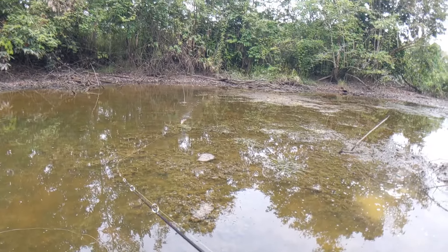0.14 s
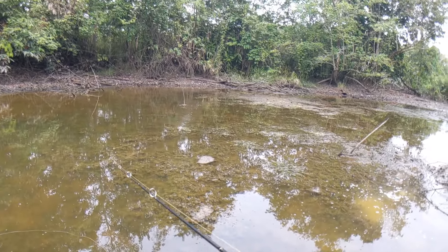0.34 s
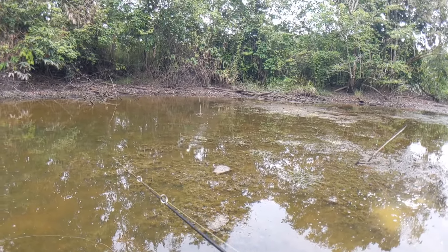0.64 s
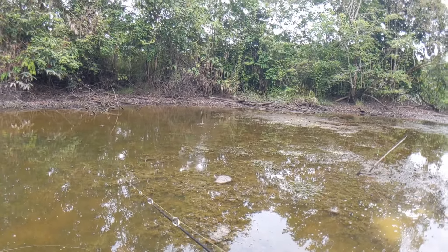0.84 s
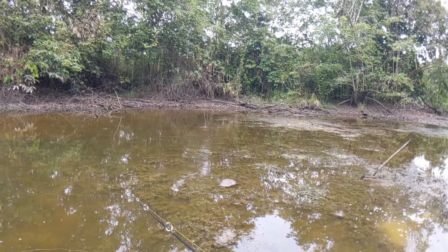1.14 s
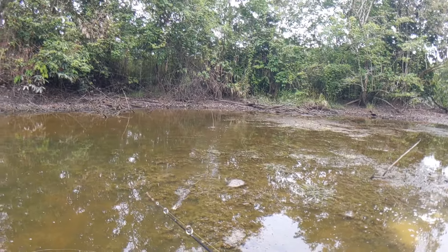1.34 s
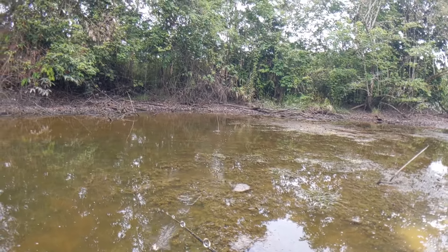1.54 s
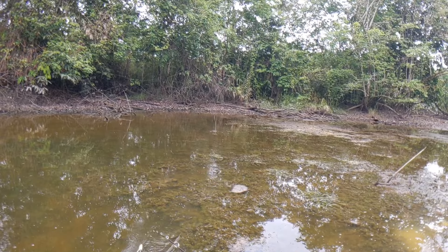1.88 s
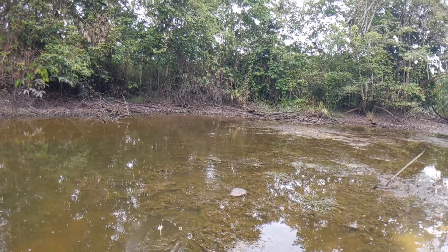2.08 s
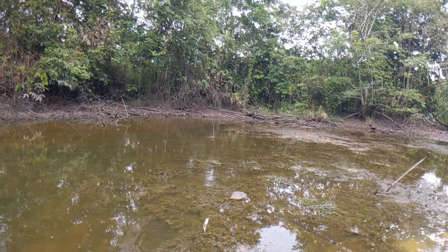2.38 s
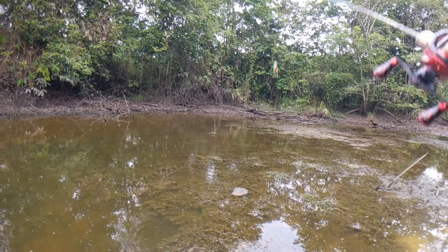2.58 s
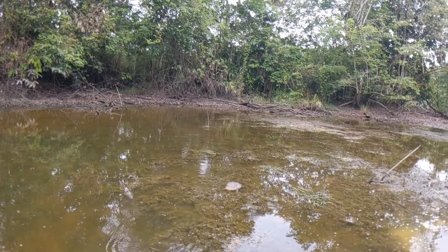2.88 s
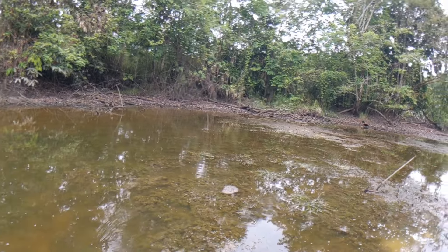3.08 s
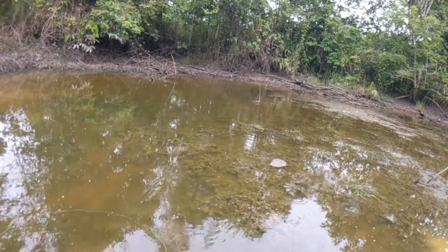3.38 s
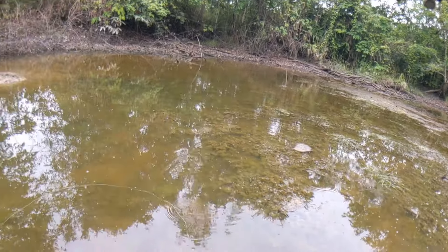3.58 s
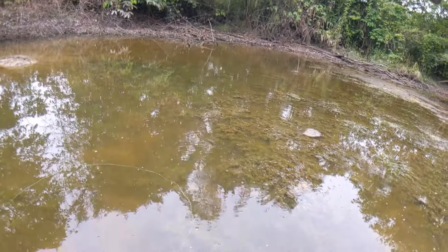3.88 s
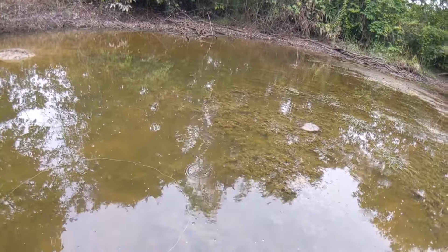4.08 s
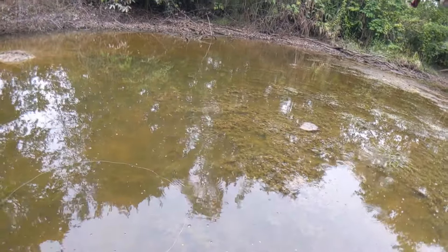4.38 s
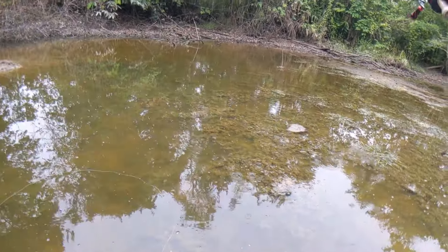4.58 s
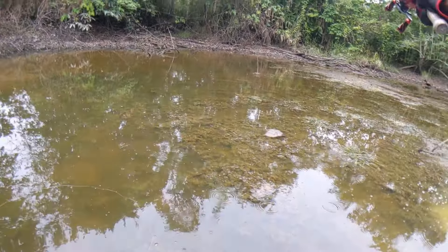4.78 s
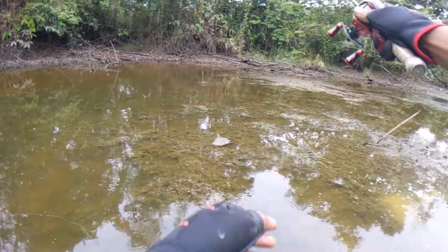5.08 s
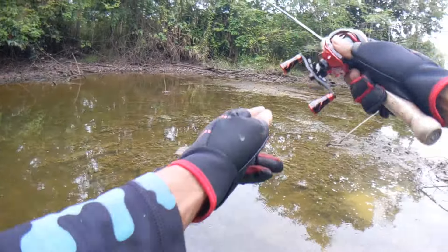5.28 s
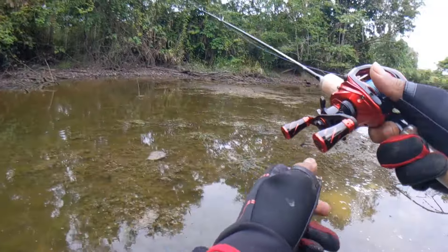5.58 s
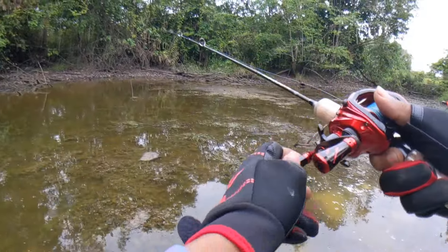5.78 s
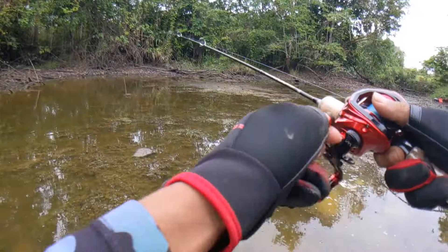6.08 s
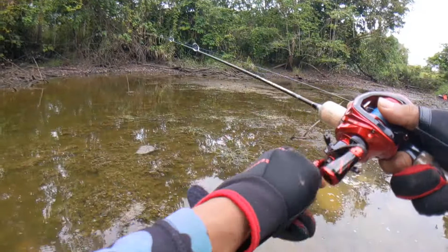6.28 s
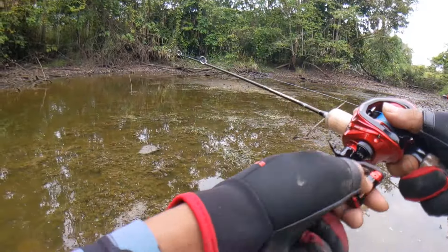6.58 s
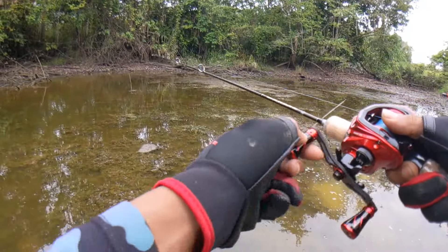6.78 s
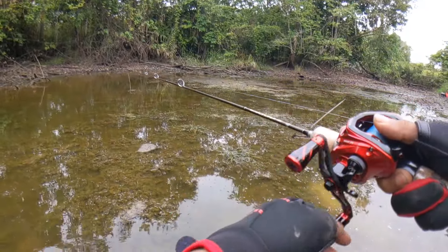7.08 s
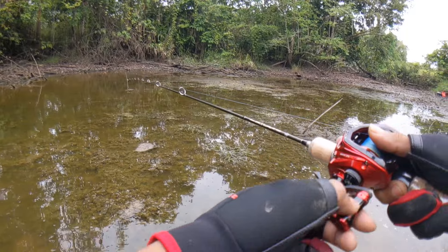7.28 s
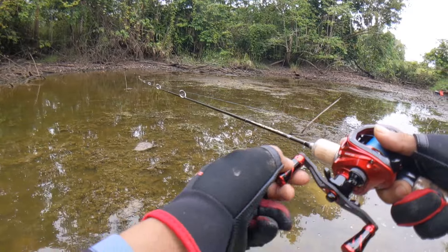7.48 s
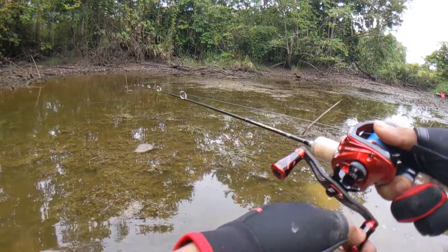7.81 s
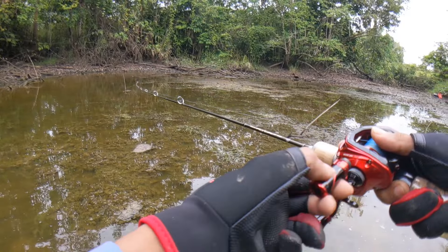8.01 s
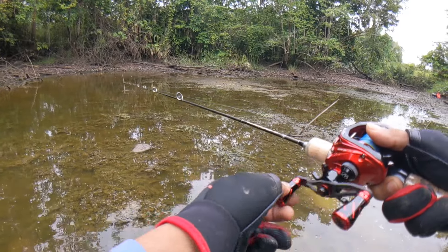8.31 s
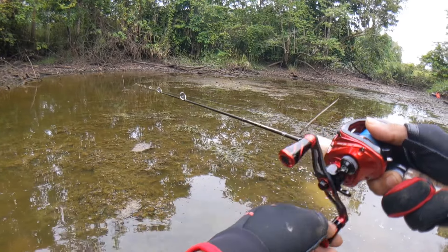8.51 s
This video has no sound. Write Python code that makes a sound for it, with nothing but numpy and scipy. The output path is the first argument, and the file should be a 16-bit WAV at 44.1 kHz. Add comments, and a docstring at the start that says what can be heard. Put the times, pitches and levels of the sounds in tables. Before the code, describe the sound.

Two sharp reel clicks stand out above stirred pond water, fine line ticks, echoing birds with falling calls, and droning insects.

```python
"""Lure fishing at a forest pond: small birds call from trees that scatter every note, as noise bands of insects
drone over a far low hum. From the start a lure stirs the weed close by, in fizz, droplets and rising bubbles,
while line and rod tick; one bird warbles, another whistles, and a third soon repeats a falling call. The reel
snaps free at 2.4 s and the lure splashes down about a second later; a high bird dips its note at 4 and 7 s.
The reel snaps shut at 5.6 s; sparse crank ticks, bursts of filtered noise, run from 4.9 s to the end."""
import sys
import numpy as np
from scipy import signal
from scipy.fft import rfft, irfft, next_fast_len
from scipy.io import wavfile
from scipy.ndimage import uniform_filter1d

SR = 44100
rng = np.random.default_rng(int(sys.argv[2]) if len(sys.argv) > 2 else 0)


def store_wav(level_fs):
    """Save 16-bit WAV to argv[1]."""
    pcm = np.round(np.clip(np.atleast_2d(level_fs), -1, 1) * 32767)
    wavfile.write(sys.argv[1], SR, pcm.T.astype(np.int16))


N = 381465
TIME, FREQ = np.arange(N) / SR, np.fft.rfftfreq(N, 1 / SR)  # s, Hz

# How the outdoor air, insects included, rises and falls: (time [s], level [dB])
AIR_LEVEL = [(0, -51), (5.3, -51.5), (5.7, -54), (8.6, -53)]


def amp(db):
    """Decibels to gain."""
    return 10 ** (np.asarray(db) / 20)


def unit(x):
    """Scales to rms 1."""
    return x / np.sqrt(np.mean(x ** 2) + 1e-20)


def read(points, hz):
    """Reads a spectrum on a log-frequency axis."""
    f, value = np.transpose(points)
    return np.interp(np.log(hz + 1), np.log(f + 1), value)


def level(rows, column=1):
    """Gain over time from one dB column of a curve."""
    rows = np.asarray(rows)
    return amp(np.interp(TIME, rows[:, 0], rows[:, column]))


def sides(balance_db):
    """Left and right gains for a level difference; positive leans left."""
    return amp(np.array([[.5], [-.5]]) * balance_db)


def add(mix, s, sound):
    """Mixes a sound in at time s."""
    part = mix[..., max(round(s * SR), 0):][..., :sound.shape[-1]]
    part += sound[..., :part.shape[-1]]


def colour(x, gain):
    """Filters a full-length sound by a gain for each frequency."""
    size = next_fast_len(N)
    hz = np.fft.rfftfreq(size, 1 / SR)
    fitted = np.apply_along_axis(lambda g: np.interp(hz, FREQ, g), -1, gain)
    return irfft(rfft(x, size) * fitted, size)[..., :N]


def drift(rate):
    """Random wander of rms 1 along straight lines between knots, rate knots a second."""
    knots = rng.standard_normal(8192)
    return unit(np.interp(TIME * rate, np.arange(len(knots)), knots))


def band(hz, width_hz):
    """Gain of a bell-shaped resonance, width_hz wide at half power."""
    return 1 / (1 + ((FREQ - hz) / (.78 * width_hz)) ** 2)


def pair(gain):
    """Coloured noise at two microphones, most alike in the bass, where waves are long."""
    # (frequency [Hz], likeness of the two sides [0-1])
    likeness = [(30, 0.78), (150, 0.72), (500, 0.35), (1200, 0.25), (4000, 0.11)]
    a, b = rng.standard_normal((2, N))
    same = np.clip(read(likeness, FREQ), -1, 1)
    left = colour(a, gain)
    right = colour(a, gain * same) + colour(b, gain * np.sqrt(1 - same ** 2))
    return unit(np.array([left, right]))


def voice(notes, waver):
    """Near-sine notes, each along rows of (s, Hz, dB), with a slight quaver of pitch."""
    out = np.zeros(N)
    for rows in notes:
        s, hz, db = np.transpose(rows)
        t = np.arange(s[0], s[-1], 1 / SR)
        quaver = unit(uniform_filter1d(rng.standard_normal(SR), size=90))[:len(t)]
        turns = np.cumsum(np.interp(t, s, hz) * (1 + waver * quaver)) / SR
        loudness = np.sqrt(2) * amp(np.interp(t, s, db))
        soft_ends = signal.windows.tukey(len(t), .08)
        add(out, s[0], loudness * np.sin(2 * np.pi * turns) * soft_ends)
    return out


def forest(x, direct_db, direct_pan_db, near_db, far_db, far_pan_db, build_s):
    """Direct sound, quick scatter from nearby leaves, and a tail that builds up from the trees across the pond."""
    # How long the trees ring: (frequency [Hz], t60 [s])
    tree_t60 = [(1500, 1), (3000, 0.49), (5000, 0.8), (8000, 0.51)]
    # sparse random reflections, on average 2500 a second
    taps = rng.standard_normal((2, 2, SR)) * (rng.random((2, 2, SR)) < 2500 / SR)
    age = np.arange(SR) / SR
    near = taps[0] * amp(-60 * age / 0.22) * (1 - np.exp(-age / 0.0013))
    # the far tail dies at its own pace in each frequency
    hz, t, z = signal.stft(taps[1], SR, nperseg=256)
    decay = amp(-60 * t / read(tree_t60, hz)[:, None])
    far = signal.istft(z * decay, SR, nperseg=256)[1][:, :SR]
    far = far * (1 - np.exp(-(age / build_s) ** 2))
    echo = (amp(near_db) * unit(near) + amp(far_db) * sides(far_pan_db) * unit(far)) / np.sqrt(SR)
    direct = np.array([x, np.roll(x, shift=1)])
    scattered = signal.oaconvolve(x[None], echo, axes=1)[:, :N]
    return amp(direct_db) * sides(direct_pan_db) * direct + scattered


def crack(spectrum, t60):
    """A dense rattle of small parts with a spectrum of (Hz, dB), dying within milliseconds."""
    t = np.arange(4096) / SR
    burst = rng.standard_normal((2, len(t))) * amp(-60 * t / t60) * (1 - np.exp(-t / 0.00016))
    gain = amp(read(spectrum, np.fft.rfftfreq(len(t), 1 / SR)))
    # shifted while filtered, so that the filter's pre-ringing can be cut off
    shaped = irfft(rfft(np.roll(burst, shift=256, axis=1)) * gain)
    return shaped[:, 256:]


def reel():
    """The clutch snaps as noise bursts and rings the housing's damped sines; gears, line and rod tick."""
    # Snaps of the clutch: (time [s], level [dB], t60 [s], housing ring re snap [dB], left-right [dB])
    snaps = [(2.3697, -14.5, 0.023, -8, -5), (2.3712, -9, 0.01, 3, 0.5), (5.558, -24, 0.02, -10, 2),
             (5.564, -37, 0.034, 3.5, 29), (5.575, -31, 0.12, -20, 2), (5.5833, -24.5, 0.046, -12, 7),
             (5.5874, -12.5, 0.011, -15, -1), (5.591, -9, 0.0074, -24, 6), (5.5939, -24, 0.02, -25, 15)]
    # Spectrum of a snap: (frequency [Hz], level [dB])
    snap_colour = [(100, -55), (400, -7), (900, 2.5), (1600, 0.5), (2600, 5.5), (4400, 7.5), (5800, 1.5),
                   (8000, 5), (10500, -1.5), (14500, -1)]
    # Modes of the reel's housing: (frequency [Hz], level [dB], t60 [s])
    housing = [(1100, -4, 0.016), (2980, -28, 0.033), (5420, -12, 0.014)]
    # Ticks of line and rod: (time [s], knock level [dB], click level [dB], left-right [dB])
    ticks = [(0.1894, -42, -18, 6), (.2395, -24, -19.5, -1), (.277, -29, -17.5, -1),
             (0.5642, -29, -16.5, -3), (0.598, -30, -21, 2), (0.675, -31, -22, 0), (0.884, -32, -24, -5),
             (1.5484, -24.5, -23.5, -1), (1.5742, -29, -23.5, 4), (1.6292, -25, -25, 5),
             (1.666, -23.5, -29, 11), (3.0006, -35, -28.5, -4), (3.242, -31, -20, -1),
             (5.3037, -22.5, -28, 5), (5.5242, -25.5, -14, 0.5), (5.8697, -32, -22, 2),
             (5.874, -20, -17.5, 2), (6.041, -33.5, -23, -6), (6.2101, -37, -27, -7),
             (6.9403, -41, -26, -11), (7.647, -35, -23, -9)]
    # Where knock, click and fizz lie: (frequency [Hz])
    tick_hz = [1100, 3980, 11900]
    # Thin high ticks of the turning crank: (time [s], level [dB])
    crank = [(4.9267, -29), (6.5965, -25), (6.827, -26.5), (6.925, -29.5), (7.808, -29), (8.2988, -29),
             (8.331, -28), (8.5083, -30)]
    # Spectrum of a crank tick: (frequency [Hz], level [dB])
    crank_colour = [(1100, -28), (4030, -25), (11700, 1)]
    tick_t60_s, fizz_db, crank_pan_db = .015, -5, 6  # the fizz level is relative to the knock

    out, t = np.zeros((2, N)), np.arange(4096) / SR
    late = np.maximum(t - np.array([[.00025], [0]]), 0)  # the reel is nearer the right side
    ring = sum(amp(db - 60 * late / t60) * np.sin(2 * np.pi * hz * late) for hz, db, t60 in housing)
    for s, db, t60, ring_db, pan_db in snaps:
        add(out, s, amp(db) * sides(pan_db) * crack(snap_colour, t60))
        add(out, s, amp(db + ring_db) * sides(pan_db) * ring)
    for s, knock_db, click_db, pan_db in ticks:
        spectrum = list(zip(tick_hz, [knock_db, click_db, knock_db + fizz_db]))
        add(out, s, sides(pan_db) * crack(spectrum, tick_t60_s))
    for s, db in crank:
        add(out, s, amp(db) * sides(crank_pan_db) * crack(crank_colour, tick_t60_s))
    # small parts radiate little bass
    return signal.sosfilt(signal.butter(2, 300, "high", fs=SR, output="sos"), out)


def churn(s, rise_s, hold_s):
    """Gain over time of disturbed water: it swells, holds, settles quickly and sloshes on."""
    settle_t60_s, slosh_db, slosh_t60_s = 0.56, -8.5, 1.36
    after = np.maximum(TIME - s - rise_s - hold_s, 0)
    release = np.maximum(amp(-60 * after / settle_t60_s), amp(slosh_db - 60 * after / slosh_t60_s))
    return np.clip((TIME - s) / rise_s, 0, 1) * release


def water():
    """A fizz of spray and separate ringing droplets where the lure moves, and single bubbles of rising pitch."""
    # The lure stirs the water: (time [s], rise [s], hold [s], level [dB])
    stirs = [(-.25, 0.46, 1.25, -45.5), (1.53, 0.05, 0.064, -45), (1.75, 0.067, 0.15, -54),
             (3.152, 0.033, .01, -47.5), (3.329, 0.047, 0.02, -39.5), (6.74, .12, .01, -53),
             (7.844, 0.065, 0.065, -61)]
    # Spectrum of the stirred water: (frequency [Hz], level [dB])
    stir_colour = [(100, -13), (250, -3.5), (450, 1), (1000, 3), (1500, -1), (2500, 1.5), (4300, -2.5),
                   (6500, -6), (10000, -13), (12500, -9), (15000, -18)]
    # Plips, each a bubble whose pitch rises: (time [s], middle pitch [Hz], level [dB])
    plips = [(2.313, 1015, -51.5), (3.351, 1060, -45.5), (3.388, 4150, -37), (3.396, 4350, -36),
             (3.408, 1710, -43.5), (4.216, 1020, -53.5), (4.724, 1620, -47), (4.735, 2230, -48.5),
             (4.986, 1900, -53), (5.254, 786, -52), (6.041, 2350, -44), (6.645, 1050, -60),
             (6.848, 740, -53.5), (7.374, 2290, -51), (7.868, 450, -59.5), (7.872, 724, -55.5),
             (7.92, 970, -57), (7.945, 1074, -56), (8.023, 1080, -59), (8.084, 2360, -46.5),
             (8.226, 2300, -44.5), (8.493, 1050, -55.5)]
    lapping_db = -59.5  # the pond's own faint stir
    bubble_cycles = 15.7  # small bubbles die sooner

    drops = (rng.random(N) < 420 / SR) * amp(3.1 * np.minimum(rng.exponential(1, N), 3))
    kind, t, patter = rng.integers(0, 20, N), np.arange(400) / SR, np.zeros(N)
    for k, hz in enumerate(np.geomspace(450, 13000, 20)):  # each droplet rings a few cycles
        droplet = np.sin(2 * np.pi * hz * t) * np.exp(-t * hz / 3.0) * hz
        patter += signal.oaconvolve(drops * (kind == k), droplet)[:N]
    droplets = unit(np.array([np.roll(patter, shift=11), patter]))  # the left side hears them later
    fizz = pair(np.ones(len(FREQ))) + amp(-2) * droplets

    power = sum((amp(db) * churn(s, rise_s, hold_s)) ** 2 for s, rise_s, hold_s, db in stirs)
    motion = np.sqrt(amp(lapping_db) ** 2 + power)
    stir = unit(colour(fizz, amp(read(stir_colour, FREQ)))) * motion * amp(2 * drift(rate=45))

    bubbles = []
    for s, hz, db in plips:
        length = bubble_cycles / hz
        bubbles.append([(s, hz / 1.14, db), (s + length / 2, hz, db), (s + length, hz * 1.09, db)])
    return stir + sides(3.8) * voice(bubbles, waver=0.077)


def spray():
    """Tiny drops patter back on the pond after the splash, as flickering high noise."""
    flicker = amp(-43.5 + 2.2 * drift(rate=56))
    return flicker * churn(3.36, rise_s=0.014, hold_s=.005) * pair(band(11000, 4500))


def gurgle(count=80):
    """Faint bubbles burst in the mud at random, each a short rising note."""
    when, size, loud = rng.random((count, 3)).T
    s, hz, db = when * TIME[-1], 340 * 4 ** size, -65 + 8 * loud
    bubbles = [[(at, f, d), (at + 20 / f, f * 1.2, d - 10)] for at, f, d in zip(s, hz, db)]
    return sides(3.8) * voice(bubbles, waver=0.024)


def falling_bird():
    """A short level lead-in near 6 kHz, a brief dip in loudness, then a fast slide down about an octave."""
    # Shape of one call: (time from its knee [s], pitch [Hz], level [dB]), before the factors of each call
    shape = [(-.042, 6050, -24), (-.02, 6103, -5), (-.007, 6300, -14.5), (.002, 6200, -8),
             (.014, 5600, -4.5), (.027, 4900, -3), (.04, 4250, -3.5), (.055, 3606, -10.5),
             (0.072, 2910, -25)]
    # The calls: (time of the knee [s], level [dB], pitch factor, length factor)
    falls = [(0.877, -37, 1, 1.14), (1.287, -38.5, 0.95, 1.43), (3.814, -38.5, 0.98, 1.15),
             (4.28, -36.5, .99, 1.27), (4.85, -36, 0.99, 1.14), (5.415, -34, 0.96, 1.03),
             (6, -39.5, 0.96, 0.99), (7.036, -35, 1.01, 0.99), (7.566, -34.5, 1.01, 0.91),
             (8.095, -33.5, 0.99, 0.98), (8.633, -31.5, 1.015, 1.03)]
    s, hz, db = np.transpose(shape)
    notes = [np.column_stack([at + s * length, hz * pitch, db + loud_db])
             for at, loud_db, pitch, length in falls]
    flutter = amp(1.6 * drift(rate=180))
    out = np.zeros((2, N))
    for k in range(3):  # three sets of reflections take turns, so the echo shifts from call to call
        call = voice(notes[k::3], waver=.005) * flutter
        out += forest(call, direct_db=-7.0, direct_pan_db=-8.5, near_db=-3.5,
                      far_db=-2.5, far_pan_db=7.5, build_s=0.052)
    return out


def high_bird():
    """A loud thin note on the left that dips and rises again; it fades toward a catch, then bursts out anew."""
    # The calls: (time [s], length [s], level [dB], swell start to end [dB], rise [s], catch [share of length])
    dips = [(4.017, .122, -24.5, 2, .02, 0.43), (7.13, .124, -31, -1.5, 0.0097, .53)]
    top_hz, depth_hz, skew = 8400, 1173, 0.77  # the pitch sinks and climbs back in one arch
    catch_s, catch_depth_db = 0.011, -13  # the voice fades just before its catch
    attack_power, release_s, edge_db = 7, .009, -15  # a quieter start, then the note opens at once

    u, notes = np.linspace(0, 1, 80), []
    hz = top_hz - depth_hz * np.sin(np.pi * u ** skew)
    for s, length, db, swell_db, rise_s, catch_at in dips:
        attack = (u * length / rise_s) ** attack_power
        release = (1 - u) * length / release_s
        opening = np.minimum(np.minimum(attack, release), 1)
        catch_db = catch_depth_db * np.exp(-abs(catch_at - u) * length / catch_s) * (u < catch_at)
        loud_db = db + swell_db * (u - .5) + catch_db + edge_db * (1 - opening)
        notes.append(np.column_stack([s + length * u, hz, loud_db]))
    return forest(voice(notes, waver=.007), direct_db=-12.0, direct_pan_db=20.5, near_db=-8,
                  far_db=-11.0, far_pan_db=15, build_s=0.0053)


def whistler():
    """Long thin trembling notes from deeper in the trees; each sags as it swells, and most end in a flick."""
    # Drawn-out whistles: (time [s], length [s], level at the end [dB])
    whistles = [(1.738, 0.28, -48), (3.0, 0.25, -49.5), (6.281, 0.18, -50.5), (7.889, .22, -48)]
    # Downward flicks that end a whistle: (time of the top [s], top pitch [Hz], fall [s], level [dB])
    flicks = [(1.985, 5050, 0.057, -45), (3.3, 5020, .05, -44.5), (6.495, 5420, .11, -34.5)]
    end_hz, sag_hz_per_s, start_db = 5090, 2000, -8.5
    scoop_from_hz, scoop_s, scoop_start_db = 4750, .027, -7  # a short scoop up to the top
    flick_end_hz, bend, fade_db = 3120, 1.3, -16  # then a fall that flattens and fades
    tremble_hz, tremble_depth = 44.2, 0.55

    notes = [[(s, end_hz + sag_hz_per_s * length, db + start_db), (s + length, end_hz, db)]
             for s, length, db in whistles]
    u = np.linspace(0, 1, 12)
    for s, top_hz, fall_s, db in flicks:
        hz = flick_end_hz + (top_hz - flick_end_hz) * (1 - u) ** bend
        fall = np.column_stack([s + fall_s * u, hz, db + fade_db * u])
        notes.append([(s - scoop_s, scoop_from_hz, db + scoop_start_db), *fall])
    tremble = 1 + tremble_depth * np.sin(2 * np.pi * tremble_hz * TIME)
    return forest(voice(notes, waver=.02) * tremble, direct_db=-5.5, direct_pan_db=-1, near_db=-12.5,
                  far_db=-5.5, far_pan_db=8, build_s=0.034)


def warbler():
    """Mellow, slightly husky slurs, each easing onto its last pitch as it swells and fades."""
    # The slurs: (time [s], length [s], first pitch [Hz], last pitch [Hz], level [dB])
    slurs = [(0, .054, 2456, 2560, -46), (0.112, 0.031, 1580, 2120, -44.5),
             (0.225, 0.033, 2700, 2023, -42.5), (0.338, 0.082, 3380, 2924, -40.5),
             (0.464, 0.052, 2380, 1955, -44), (0.516, 0.0306, 1960, 1610, -54.5),
             (0.706, 0.055, 2274, 2980, -46), (0.732, 0.083, 2694, 2410, -46.5),
             (0.889, .062, 2375, 1666, -46), (1.092, 0.026, 2484, 1740, -44.5),
             (1.164, 0.052, 1960, 2546, -47), (1.299, .043, 1963, 2470, -45.5),
             (1.335, 0.048, 2350, 3210, -43), (1.58, 0.06, 1690, 2525, -45.5)]
    ease, edge_db = 2.346, -6  # each slur glides fast, then settles on its last pitch
    u, notes = np.linspace(0, 1, 12), []
    for s, length, first, last, db in slurs:
        hz = last + (first - last) * (1 - u) ** ease
        notes.append(np.column_stack([s + length * u, hz, db + edge_db * (2 * u - 1) ** 2]))
    husk = 1 + .35 * drift(rate=300)
    return forest(voice(notes, waver=.02) * husk, direct_db=-4.5, direct_pan_db=20, near_db=0.5,
                  far_db=-1.5, far_pan_db=5.5, build_s=0.028)


def insects():
    """Many buzzing insects merge into bands of noise that drift in level."""
    # The choirs: (centre [Hz], width [Hz], level [dB], left-right [dB])
    choirs = [(6000, 1300, -67, 15), (5920, 110, -62, 4.5), (6700, 290, -64.5, 8), (7174, 640, -52.5, 5.5),
              (8250, 420, -60.5, 4.5), (9280, 780, -57.5, -6)]
    out = np.zeros((2, N))
    for hz, width_hz, db, pan_db in choirs:
        choir = unit(colour(rng.standard_normal((2, N)), band(hz, width_hz)))
        out += amp(db + .5 * drift(rate=5.0)) * sides(pan_db) * choir
    return out * level(AIR_LEVEL) / level(AIR_LEVEL).mean()


def air():
    """Soft outdoor wash of noise over a far wavering hum and a low rumble."""
    # Spectrum of the wash: (frequency [Hz], level [dB])
    wash_colour = [(20, 9), (45, 14), (90, 9), (140, 6.5), (250, 1.5), (500, 1), (900, -7), (1700, -6),
                   (3000, -8), (4800, -4), (8500, -8), (10800, -9.5), (14500, -7)]
    # Lean of the wash: (frequency [Hz], left-right [dB])
    wash_balance = [(100, 2), (3000, 3), (5000, 0.5), (8000, -8), (11000, -3), (15000, -7.5)]
    # Far hum, before the trim of each part: (time [s], low line level [dB], high line level [dB])
    hum_level = [(0, -57.5, -58.5), (3.9, -63, -54.5), (6.2, -69, -55), (8.65, -69, -57)]
    # Rumble, before its trim: (time [s], level [dB])
    rumble_level = [(0, -65), (3.6, -64.5), (6.5, -77), (8.65, -68)]
    wash = colour(pair(amp(read(wash_colour, FREQ))), sides(read(wash_balance, FREQ))) * level(AIR_LEVEL)
    line = np.sin(2 * np.pi * np.cumsum(55 + 2 * drift(rate=6.5)) / SR)
    low_hum = level(hum_level) * (amp(5) * line + amp(-8) * pair(band(52, 9)))
    high_hum = amp(-9) * level(hum_level, column=2) * pair(band(87, 8.8))
    rumble = amp(1.0) * level(rumble_level) * pair(band(14, 23))
    return wash + low_hum + high_hum + rumble


def scene():
    """Reel and water close to the microphones, birds and insects in the trees."""
    # Lean of things near the hands: (frequency [Hz], left-right [dB])
    near_balance = [(500, 0.5), (3000, 0), (5500, 8), (8000, -2), (11000, -10), (15000, -12)]
    near = colour(reel() + water() + spray() + gurgle(), sides(read(near_balance, FREQ)))
    birds = falling_bird() + high_bird() + whistler() + warbler()
    return near + birds + insects() + air()


def record(dry):
    """Clips at full scale, then cuts the treble above the band edge."""
    edge_hz = 15450
    lowpass = signal.firwin(511, edge_hz, window=("kaiser", 9), fs=SR)
    return signal.oaconvolve(np.clip(dry, -1, 1), lowpass[None], "same")


dry = scene()
out = record(dry)
store_wav(out)
```